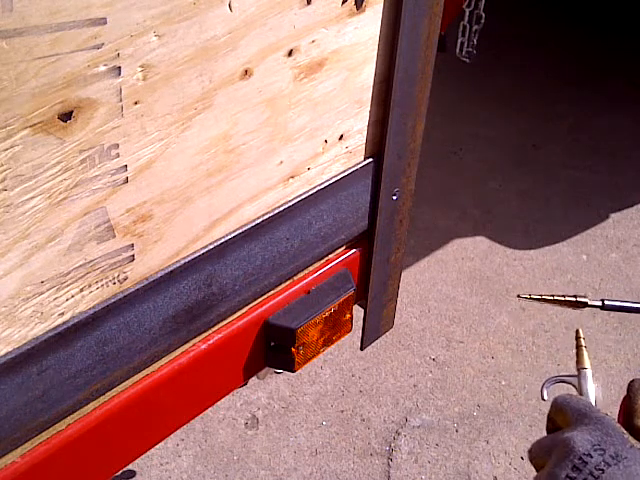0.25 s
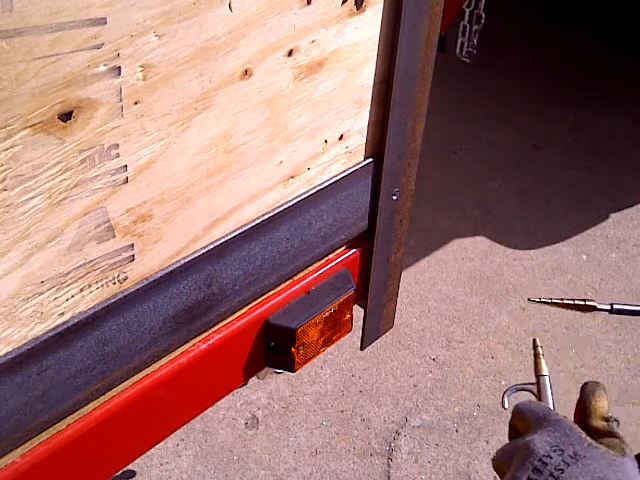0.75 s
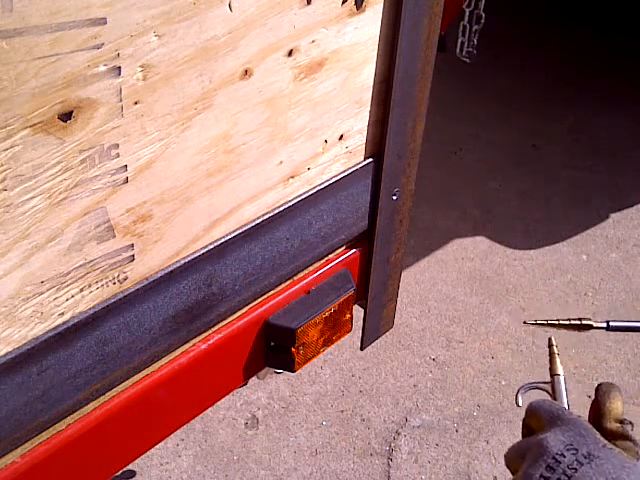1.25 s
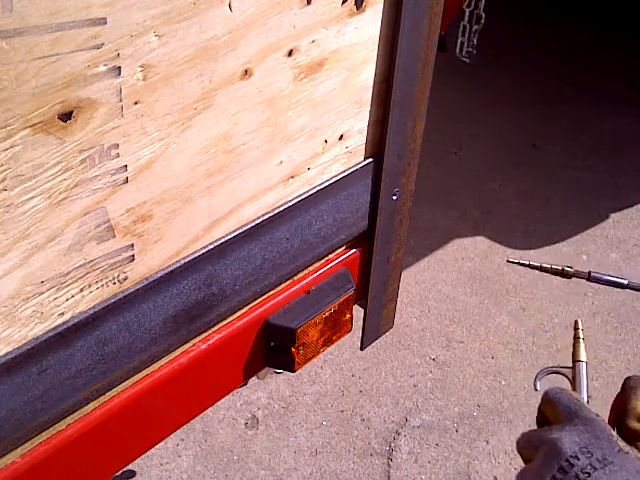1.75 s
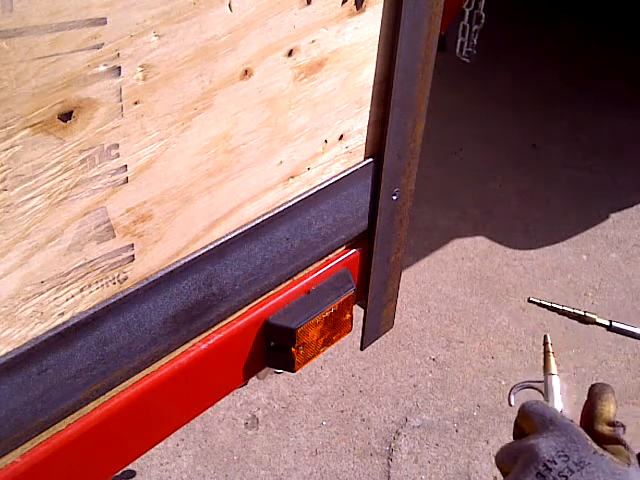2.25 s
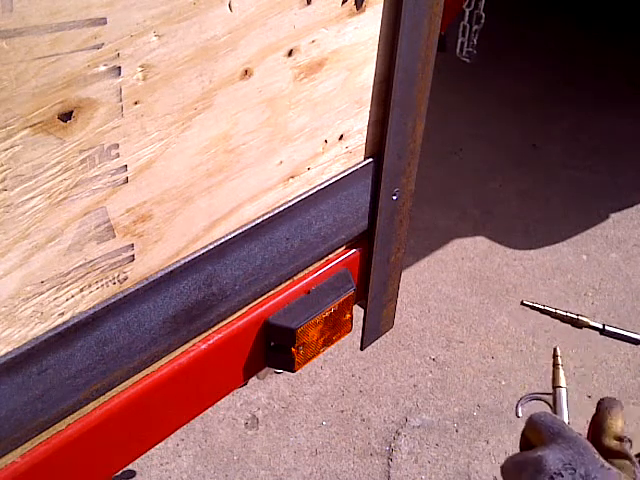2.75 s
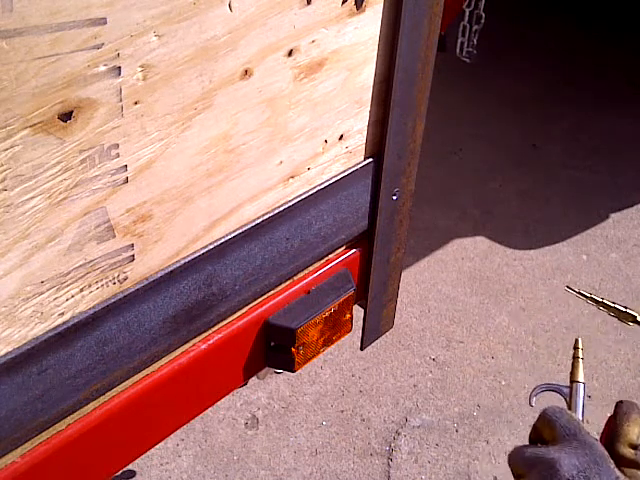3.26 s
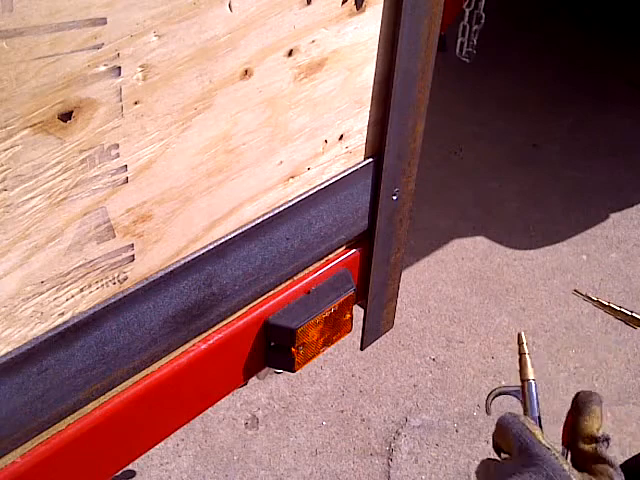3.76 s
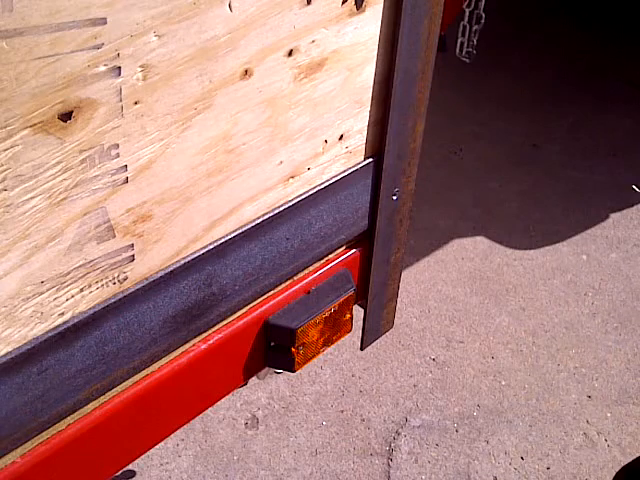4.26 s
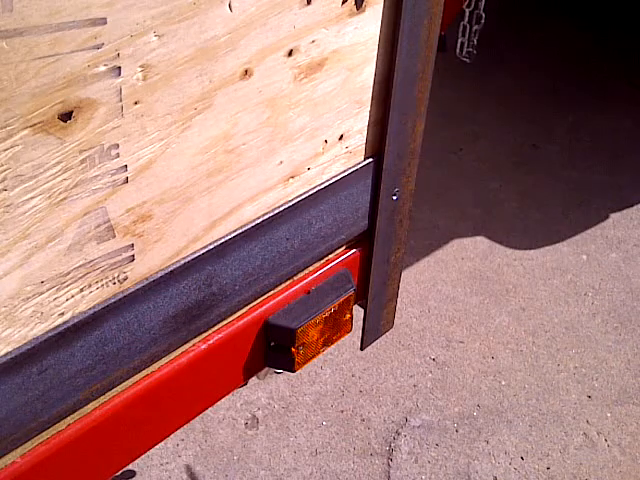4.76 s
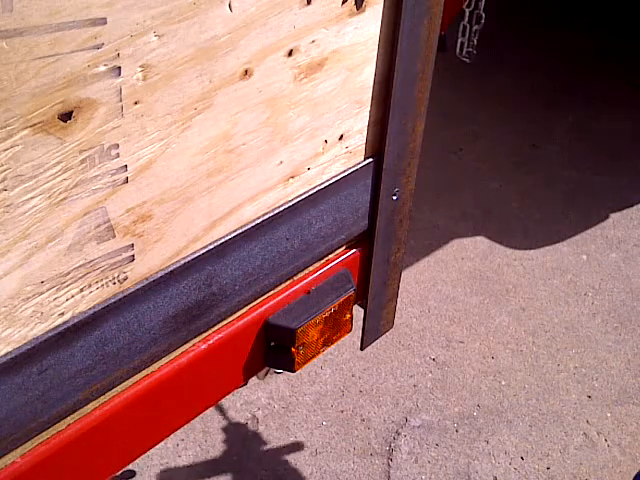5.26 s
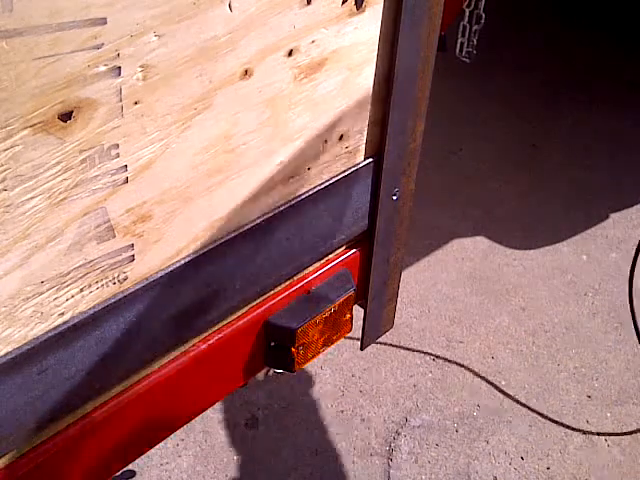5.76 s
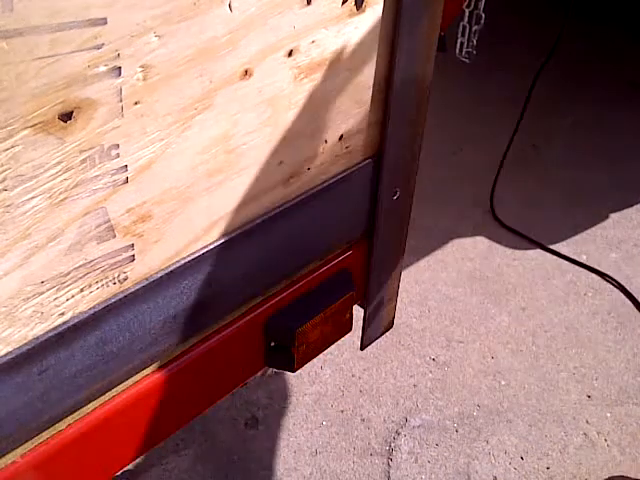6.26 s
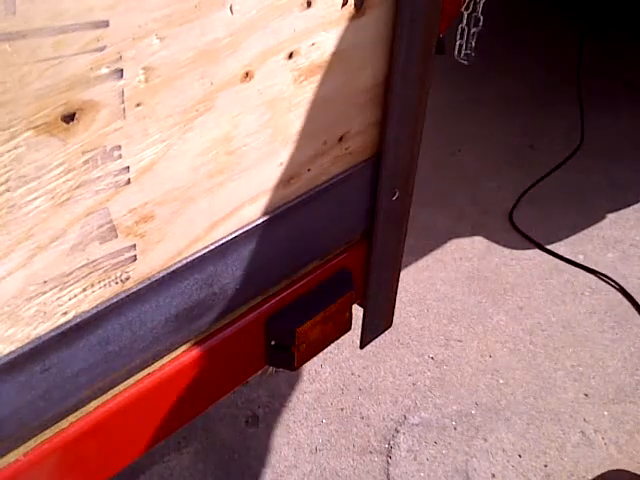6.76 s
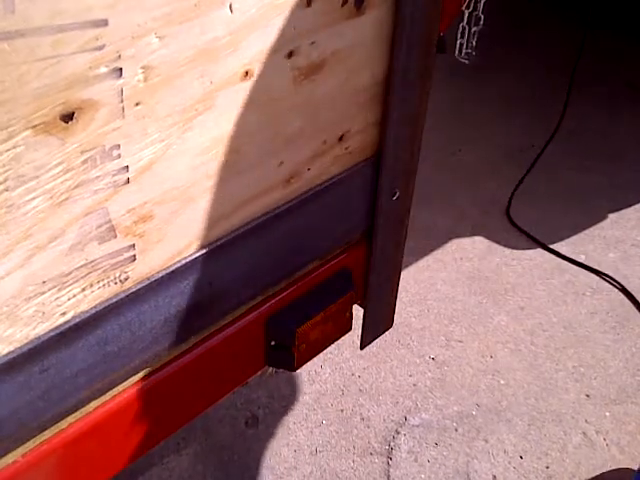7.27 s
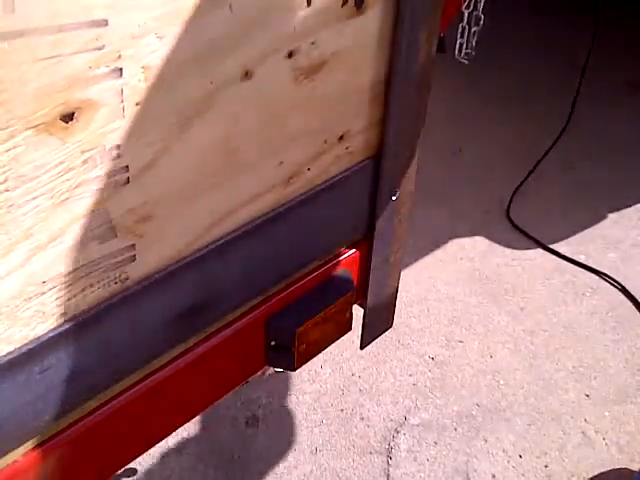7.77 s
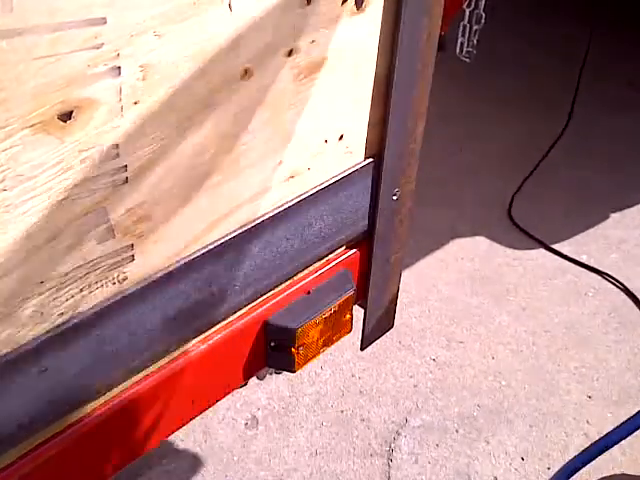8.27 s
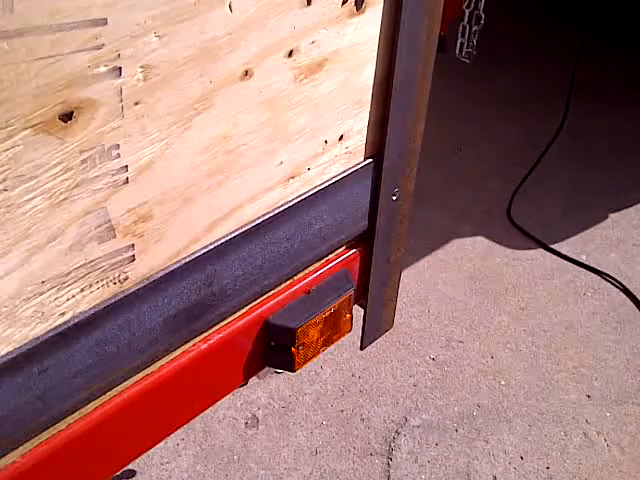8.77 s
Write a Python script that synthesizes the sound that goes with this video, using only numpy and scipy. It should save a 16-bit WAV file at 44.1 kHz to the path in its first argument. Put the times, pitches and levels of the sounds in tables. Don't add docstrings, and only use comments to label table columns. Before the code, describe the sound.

Two hissing blasts from a compressed-air blow gun, roaring and whistling as a drill bit crosses the jet, over a steady compressor drone outdoors.

```python
import sys
import numpy as np
from scipy import signal
from scipy.fft import rfft, irfft
from scipy.io import wavfile
from scipy.ndimage import uniform_filter1d

SR = 44100
rng = np.random.default_rng(int(sys.argv[2]) if len(sys.argv) > 2 else 0)


def convert_level_to_amplitude(level_db):
    exponent = np.asarray(level_db, float) / 20
    return 10 ** exponent


def dump(signal):
    limited = np.clip(np.atleast_2d(signal).T, -1, 1)
    pcm = np.round(limited * 32767).astype(np.int16)
    wavfile.write(sys.argv[1], SR, pcm)


N = 398663


def blow_gun():
    jet = air(jet_field, size=256, patchy_db=.7)
    radiated = jet + squeaks() + flutes(width_hz=160)
    return convert_level_to_amplitude(-.6) * echoed(radiated) + gusts()


# fully open t/s, shut t/s, free jet level/dB, opening rate [dB/s]
PULLS = [
    (0.51, 1.561, -36, 213),
    (2.207, 3.874, -37.5, 328),
]


def jet_field(hz, t):
    struck, free_db = struck_power(hz, t), free_jet(hz)
    power = 1e-20
    last_shut = 0
    for opened, shut, db, rise_db in PULLS:
        opening = convert_level_to_amplitude(-rise_db * np.maximum(opened - t, 0)) ** 2
        valve = opening * (t < shut) * (t >= last_shut)
        power = power + valve * (struck + convert_level_to_amplitude(free_db + db) ** 2)
        last_shut = shut
    flicker_db = 0.73 * rng.standard_normal(len(t))
    return 10 * np.log10(power) + flicker_db


# f/Hz, level/dB per Hz
FREE_JET = [(110, -54), (500, -11), (1000, -14), (1600, -8.5), (2200, -8), (3000, 3), (3800, 2), (5000, -2),
            (6000, -8.5), (7000, -10.5), (8000, -3.5)]


def free_jet(hz):
    return jet_colour(FREE_JET, hz, roar_db=-5.5, sizzle_db=-11)[0]


# f/Hz, level/dB per Hz
STRUCK_JET = [(120, -44), (800, -13), (1200, -3.5), (1400, -7), (1650, -1.5), (2150, -7.5), (2450, -8.5),
              (2750, -2), (3400, 0.5), (4200, -2), (4700, -6), (5800, -2.5), (6400, -9), (8000, -8.5)]
# in t/s, out t/s, level going in/dB, level coming out/dB, brightness/dB
PASSES = [(0.516, 0.828, -28, -21, -.9), (.983, 1.082, -37, -28.5, 2.5), (1.073, 1.13, -33.5, -32, -4),
          (1.173, 1.288, -29.5, -26.7, 0.3), (1.461, 1.556, -43.5, -34, 1.5),
          (2.206, 2.39, -35.8, -25, -1.5), (2.496, 2.62, -36.5, -39, -5.5), (2.646, 2.758, -28, -25, 0.2),
          (2.805, 2.896, -28.5, -24, -1), (3.499, 3.597, -29, -26.5, -0.5),
          (3.646, 3.776, -28, -27.5, -2.3), (3.853, 3.87, -42, -40, -7)]


def struck_power(hz, t):
    enter_db_per_s, leave_db_per_s = 302.5, 203.5
    slide = 1 + .03 * drift(t, top_hz=7.3)
    struck_db, tilt = jet_colour(STRUCK_JET, hz, roar_db=-6, sizzle_db=-5.7, slide=slide)
    passes = 0
    for start, end, in_db, out_db, bright_db in PASSES:
        level_db = np.interp(t, [start, end], [in_db, out_db])
        level_db = level_db - enter_db_per_s * np.maximum(start - t, 0)
        level_db = level_db - leave_db_per_s * np.maximum(t - end, 0)
        passes = passes + convert_level_to_amplitude(bright_db * tilt) ** 2 * convert_level_to_amplitude(level_db) ** 2
    return convert_level_to_amplitude(struck_db) ** 2 * passes


def jet_colour(points, hz, roar_db, sizzle_db, slide=1):
    low = np.clip((2600 - hz) / 600, 0, 1)
    high = np.clip((hz - 4600) / 900, 0, 1)
    db = read(points, hz * slide)
    db = db - band_db(db, hz, 2500, 5000)
    db = db + low * (roar_db - band_db(db, hz, 1000, 2000))
    db = db + high * (sizzle_db - band_db(db, hz, 5500, 7200))
    return db, high - low


# from t/s, to t/s, from f/Hz, to f/Hz, peak level/dB
FLUTE_TONES = [
    (.58, .69, 3600, 2700, -31),
    (.7, .84, 3900, 3100, -27),
    (1.06, 1.14, 3000, 2800, -34),
    (2.63, 2.7, 2800, 2900, -34),
    (2.78, 2.92, 3500, 2900, -31),
    (3.49, 3.6, 3100, 2700, -33),
    (3.62, 3.8, 3550, 2750, -29),
]


def flutes(width_hz):
    out = np.zeros(N)
    slow_filter = signal.butter(2, width_hz / 2, fs=SR, output="sos")
    for start, end, hz_from, hz_to, db in FLUTE_TONES:
        count = round((end - start) * SR)
        angle = 2 * np.pi * np.cumsum(np.linspace(hz_from, hz_to, count)) / SR
        a, b = signal.sosfilt(slow_filter, rng.standard_normal((2, count)))
        tone = a * np.cos(angle) + b * np.sin(angle)
        out[round(start * SR):][:count] += convert_level_to_amplitude(db) * evened(tone) * signal.windows.tukey(count, .6)
    return out


# t/s, peak level/dB, f/Hz, width [Hz], length [s]
SQUEAKS = [(1.554, -29, 3600, 500, .018), (3.8725, -24.5, 3450, 150, .009), (3.8725, -43, 6800, 500, .008),
           (1.287, -28, 3600, 2000, .025), (2.335, -28, 2900, 3600, .05), (2.72, -29, 3300, 1500, .035),
           (1.075, -33, 3900, 1500, .03), (2.2, -34, 4200, 3500, .025), (7.22, -53, 3500, 30, .1)]


def squeaks():
    def band(row):
        centre, width = row[2], row[3]
        return signal.butter(2, [centre - width / 2, centre + width / 2], "band", fs=SR, output="sos")
    return puffs(SQUEAKS, band)


# t/s, peak level/dB, length [s]
GUSTS = [(.57, -44, 0.13), (.77, -36.5, 0.18), (1.29, -47, .06), (2.35, -43, .1), (2.72, -45, .1),
         (2.88, -43, 0.096), (3.6, -51, .2)]


def gusts():
    return puffs(GUSTS, lambda row: signal.butter(2, [130, 450], "band", fs=SR, output="sos"))


# delay t/ms, level/dB
ECHOES = [(.75, -13), (2.3, -14), (3.1, -16), (9, -20), (17, -22), (26, -26)]


def echoed(x):
    t = np.arange(N) / SR
    late = 0
    for ms, db in ECHOES:
        wander = 1 + .05 * drift(t[::1000], top_hz=2).repeat(1000)[:N]
        late = late + convert_level_to_amplitude(db) * np.interp(t - ms / 1000 * wander, t, x)
    return x + late


# t/s, rotation f/Hz
SHAFT = [(0, 56.607), (9.1, 56.581)]


def compressor():
    t = np.arange(N) / SR
    turn = np.exp(2j * np.pi * np.cumsum(np.interp(t, *np.transpose(SHAFT))) / SR)
    rush = air(rush_field, size=2048, patchy_db=.9)
    throb = 1 + .09 * turn.real
    return np.sqrt(2) * convert_level_to_amplitude(-38.5) * pump(t, turn) + convert_level_to_amplitude(-42.5) * evened(rush * throb)


def pump(t, turn):
    slow = t[::1000]
    levels, lag = multiple_levels(slow), stroke_lags()
    out, wave = np.zeros(N), np.ones(N)
    for k in sorted(levels):
        wave = wave * turn
        sway_db = np.clip(.2 * (k - 13), .4, 1.3) * drift(slow, top_hz=2)
        level = np.interp(t, slow, convert_level_to_amplitude(levels[k] + sway_db))
        out += level * (wave * np.exp(-2j * np.pi * lag[k])).real
    return out


PUMP = [-33, -6.5, -23, -27, -9.5, -13, -7, 0, -5, -.5, -10, -15, -14, -21, -3, -15, -18, -18]
# multiple, level/dB
WHINE = [(19, -23), (22, -18), (23, -21), (24, -21), (26, -20), (29, -19), (30, -23), (31, -15), (35, -20),
         (38, -19), (45, -21), (46, -21), (51, -24), (55, -26), (56, -25), (57, -21), (72, -34), (78, -36),
         (81, -31), (90, -40)]
# t/s, level/dB
SHADE = [(0, 0.5), (2, .5), (2.8, -1), (4.2, -1), (5, -3.5), (5.6, 2.5), (7.8, -0.2), (8.3, -10),
         (9.1, -10)]
# multiple, level/dB, share of the shade, sag [dB/s]
SHADED = [(32, -11, 1, 0), (52, -13.5, .3, -.5)]


def multiple_levels(slow):
    levels = {}
    for k in range(19, 110):
        fall_db = 0.26 * (k - 19) * (1 + k / 62)
        levels[k] = -25 - fall_db + 6 * rng.standard_normal()
    levels.update(dict(enumerate(PUMP, 1)) | dict(WHINE))
    shade_db = np.interp(slow, *np.transpose(SHADE))
    for k, db, share, sag_db in SHADED:
        levels[k] = db + share * shade_db + sag_db * slow
    return levels


STROKES = [(0, -.4), (7, .02), (9, .25), (13, -.27), (15, -.075), (16, -.43), (18, .15)]


def stroke_lags():
    tops, places = np.transpose(STROKES)
    lag = np.cumsum(places[np.searchsorted(tops, np.arange(19))])
    return np.append(lag, rng.random(100))


# f/Hz, level/dB per Hz
FAN = [(25, -20), (60, -10), (200, -7.5), (500, -3), (900, -6), (1150, -11), (2100, -13.5), (3000, -9.5),
       (3800, -17.5), (4900, -19), (5500, -21.5), (6200, -26.5), (7000, -31), (8000, -33)]
# f/Hz, width [Hz], level/dB
SHROUD = [(4070, 90, 4), (4440, 70, 8), (4620, 70, 7), (5110, 60, 8), (5250, 70, 7)]


def rush_field(hz, t):
    rings_db = sum(db / (1 + (2 * (hz - f) / width) ** 2) for f, width, db in SHROUD)
    ripple_db = 1.6 * evened(uniform_filter1d(rng.standard_normal(hz.shape), size=2, axis=0))
    return read(FAN, hz) + rings_db + ripple_db + .5 * drift(t, top_hz=4)


# t/s, peak level/dB, top f/Hz, length [s]
SCUFFS = [(5.94, -45, 450, .08), (6.425, -36, 1800, .04), (6.447, -36.5, 1200, .04), (6.47, -46, 300, .1),
          (6.62, -47, 250, .2), (6.67, -46, 900, .05), (6.835, -36, 1700, .06), (6.865, -38, 1100, .08),
          (6.85, -44, 300, .08), (6.92, -45, 800, .12), (7.9, -44, 400, .1), (7.98, -49, 300, .08)]


def shuffling():
    return puffs(SCUFFS, lambda row: signal.butter(3, [120, row[2]], "band", fs=SR, output="sos"))


def puffs(rows, shape):
    out = np.zeros(N)
    for row in rows:
        s, db, length = row[0], row[1], row[-1]
        noise = signal.sosfilt(shape(row), rng.standard_normal(8820))
        noise = noise[-round(length * SR):]
        at = round((s - length / 2) * SR)
        out[at:at + len(noise)] += convert_level_to_amplitude(db) * evened(noise) * np.hanning(len(noise))
    return out


def air(field_db, size, patchy_db):
    hop = size // 4
    hz = np.fft.rfftfreq(size, 1 / SR)[:, None]
    t = np.arange(N // hop + 5) * hop / SR
    a, b, patches = rng.standard_normal((len(t), len(hz), 3)).T
    patches = uniform_filter1d(patches, size=size // 64, axis=0)
    patches = evened(uniform_filter1d(patches, size=8192 // size, axis=1))
    z = (a + 1j * b) * convert_level_to_amplitude(field_db(hz, t) + patchy_db * patches)
    noise = signal.istft(z, nperseg=size, noverlap=size - hop)[1][:N]
    return noise * np.sqrt(SR / size * 3 / 2)


def band_db(db, hz, lo, hi):
    inside = (hz[:, 0] > lo) & (hz[:, 0] < hi)
    return 10 * np.log10((convert_level_to_amplitude(db[inside]) ** 2).sum(axis=0) * hz[1, 0])


def read(points, hz):
    f, value = np.transpose(points)
    return np.interp(np.log(hz + 1), np.log(f + 1), value)


def drift(t, top_hz):
    sines = 0
    for f in top_hz * np.geomspace(.05, 1, num=16):
        sines = sines + np.sin(2 * np.pi * (f * t + rng.random())) / np.sqrt(f)
    return evened(sines)


def evened(x):
    return x / np.sqrt(np.mean(x ** 2) + 1e-20)


def scene():
    return (blow_gun() + compressor() + shuffling())[None]


def roll_off(x):
    return signal.sosfilt(signal.butter(12, 9200, fs=SR, output="sos"), x)


# f/Hz, level/dB
EDGE = [(6500, 0), (7000, -4), (7500, -19), (7750, -37), (7950, -70)]
# f/Hz, level/dB
MIRROR = [(8100, -14), (8250, -7), (8500, -13), (8800, -25), (9000, -36), (9200, -58), (9400, -99)]


def record(dry):
    camera_hz = 16000
    hz = np.fft.rfftfreq(N, 1 / SR)
    kept = irfft(rfft(dry) * convert_level_to_amplitude(read(EDGE, hz)) * (hz < camera_hz / 2), N)
    image = 2 * kept * np.cos(2 * np.pi * camera_hz * np.arange(N) / SR)
    leak = convert_level_to_amplitude(read(MIRROR, hz)) * (hz > camera_hz / 2)
    mix = kept + irfft(rfft(image) * leak, N)
    return roll_off(mix)


dry = scene()
out = record(dry)
dump(out)
```